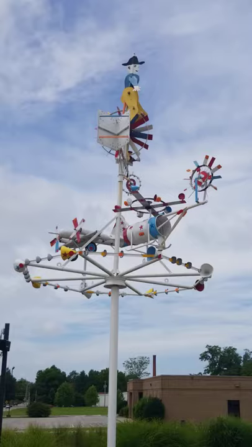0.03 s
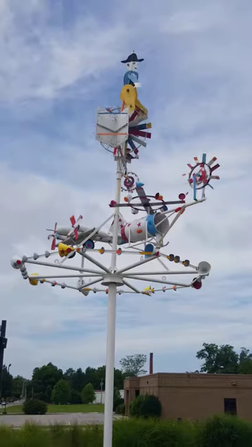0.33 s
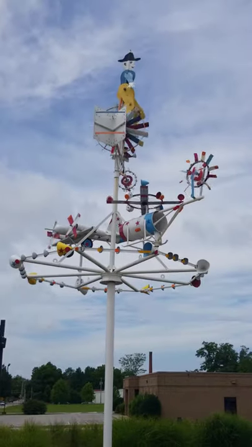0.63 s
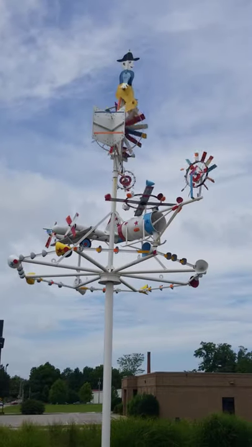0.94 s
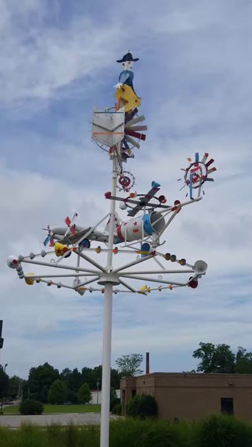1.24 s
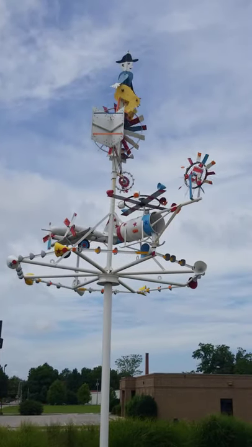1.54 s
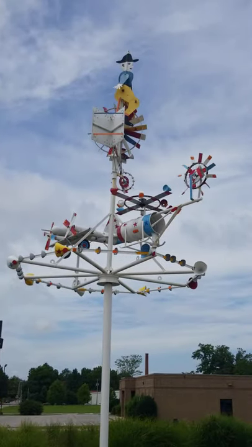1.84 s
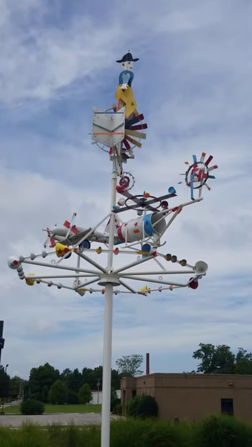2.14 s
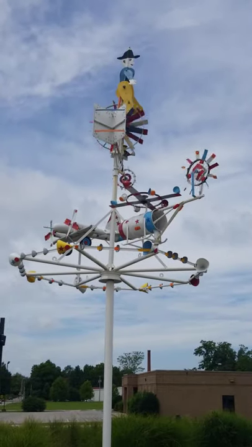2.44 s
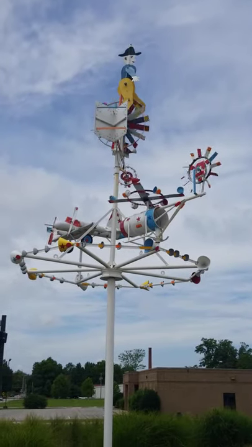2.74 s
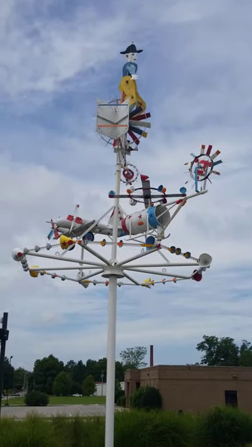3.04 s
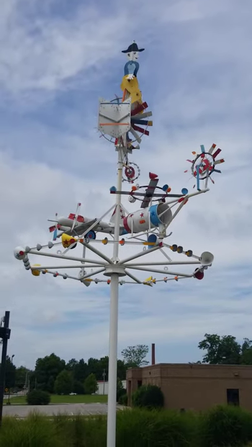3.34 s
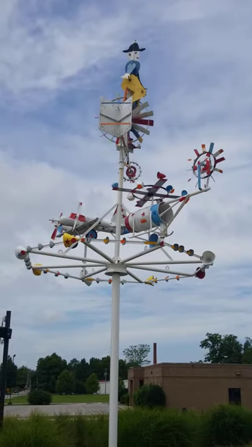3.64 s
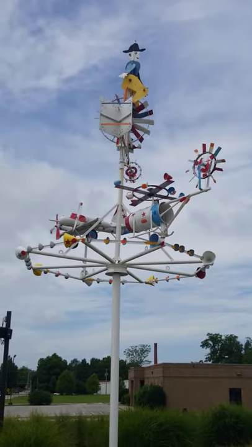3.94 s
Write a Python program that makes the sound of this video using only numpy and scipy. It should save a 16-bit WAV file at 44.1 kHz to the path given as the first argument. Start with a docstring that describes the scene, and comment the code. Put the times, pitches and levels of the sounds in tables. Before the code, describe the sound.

A metal whirligig ticks and creaks in the open air until a sharp steel clank brings a short scrape and three high squeaks. A fainter squeal comes later, with wind gusting on the microphone and far traffic throughout.

```python
"""Wind rumble on the microphone fades in over the steady wash of far traffic.
A tall metal whirligig turns in the light wind: its linkage ticks and its joints creak faintly.
The linkage drops with one sharp clank, ringing the steel, and scrapes on.
A dry bearing sticks and slips in three squeaks; later another sings faintly."""
import sys
import numpy as np
from scipy import signal
from scipy.fft import rfft, irfft
from scipy.io import wavfile

SR = 44100
rng = np.random.default_rng(int(sys.argv[2]) if len(sys.argv) > 2 else 0)


def wav_out(sig):
    """Save sig, one row per channel (or a flat mono array), as 16-bit PCM at SR to the path in sys.argv[1]."""
    wavfile.write(sys.argv[1], SR, np.round(np.clip(np.atleast_2d(sig).T, -1, 1) * 32767).astype(np.int16))


N = 176400
TIME_S = np.arange(N) / SR
FREQS_HZ = np.maximum(np.fft.rfftfreq(N, 1 / SR), 1)

# Gusts at the two microphone ports. Each row: centre and length in seconds, left and right relative dB.
GUSTS = [(0.556, 0.098, -34, -26.5), (0.67, 0.11, -26, -26.5), (0.942, 0.24, -39, -36.5),
         (1.181, 0.11, -38.5, -16), (1.33, 0.2, -34.5, -26), (1.496, 0.19, -28.5, -24),
         (1.655, 0.25, -36.5, -29.5), (1.775, 0.053, -47, -20.5), (1.874, 0.076, -44, -25.5),
         (2.069, 0.13, -33, -28.5), (2.192, 0.026, -31, -29), (2.383, 0.062, -42, -24),
         (2.444, 0.18, -28, -28), (2.613, 0.21, -36.5, -32.5), (3.21, 0.13, -28.5, -47),
         (3.35, 0.04, -27, -40), (3.465, 0.076, -32.5, -32), (3.772, 0.1, -30.5, -28.5),
         (3.96, 0.17, -28.5, -23)]
# Wind turbulence. Each row: frequency in Hz, relative density in dB.
RUMBLE_SPECTRUM = [(15, -30), (25, -16), (40, -5), (65, 5.5), (100, -3), (150, -11), (220, -17), (400, -25),
                   (1000, -57.5), (5000, -110)]
# Wash of far traffic and leaves. Each row: time in seconds, level in dB.
WASH_LEVELS = [(.5, -35.5), (.8, -32.5), (1.4, -34), (2.1, -34), (2.9, -35.5), (3.4, -34.5), (4, -36)]
# Wash colour. Each row: frequency in Hz, left and right relative density in dB.
WASH_SPECTRUM = [(25, -18, -22), (48.5, 6, 8.5), (68.6, 13, 12.5), (119, 8, 8.5), (203, 2.5, 3.5),
                 (332, -1.5, -0.5), (614, -3.5, -2), (990, -6, -3), (1700, -12, -2.5), (2920, -15, -10),
                 (3120, -17.5, -19.5), (3620, -19, -18), (4280, -20.5, -12), (5060, -20.5, -16),
                 (5980, -17, -27), (6290, -23, -30.5), (7800, -33, -22), (8630, -59, -30.5),
                 (10240, -38, -39.5), (11600, -35.5, -32.5), (13500, -42, -38), (16000, -38, -45)]
# Wash width. Each row: frequency in Hz, left-right correlation.
WASH_CORRELATION = [(60, 0.52), (200, 1), (400, 0.93), (700, 0.87), (1290, 0.44), (2400, 0), (15000, 0.05)]
# Far engines. Each row: centre and half-width in Hz, level in dB.
ENGINE_DRONES = [(72.9, 7.9, -42.5), (248.4, 14.3, -47.5), (533, 24, -53), (915, 130, -58)]
# Rattle of the turning wheels. Each row: frequency in Hz, relative density in dB.
RATTLE_SPECTRUM = [(1500, -15), (4000, 0), (8000, -6), (9500, -1), (12000, -1), (16000, -14)]
# Linkage ticks. Each row: start in seconds, level in dB, T60 in seconds, treble gain in dB.
LINKAGE_TICKS = [(0.457, -49, .02, 8), (.597, -33.5, 0.044, 4), (0.9904, -36.5, .012, 6),
                 (.995, -26.5, 0.013, -11), (1.252, -55, .04, -5), (2.1924, -44.5, 0.078, -4),
                 (2.6463, -48, 0.21, -10), (2.77, -48, 0.057, 5), (2.9323, -46, .04, -3),
                 (3.295, -43, 0.19, -12), (3.485, -46, .08, 0), (3.81, -46.5, 0.11, -3)]
# Tick colour. Each row: frequency in Hz, relative density in dB.
TICK_SPECTRUM = [(1000, -28), (2500, 3.5), (5500, 8.5), (8000, 0.5), (9500, -24), (13000, -3), (16000, -31)]
# Joint creaks. Each row: start and length in seconds, pitch, glide and RMS jitter in Hz, level in dB.
JOINT_CREAKS = [(0.547, 0.19, 4200, -84, 17, -55), (.65, .42, 7360, -450, 130, -64),
                (0.799, 0.26, 4820, -47, 150, -55), (1.169, 0.027, 2050, -21, 30, -44),
                (1.324, 0.012, 2270, 3, 130, -37.5), (1.364, 0.048, 2220, 60, 40, -44),
                (1.398, .06, 4950, 70, 43, -58), (1.407, 0.051, 2500, 98, 90, -47),
                (1.673, 0.09, 1950, 402, 110, -44), (1.726, 0.087, 2670, 354, 110, -48),
                (1.74, .06, 3560, -57, 40, -53), (2.457, .05, 2130, -90, 40.6, -54),
                (3.1, 0.036, 2420, 0, 50, -48)]
# Contacts of the dropping linkage. Each row: time in seconds, relative strength and treble gain in dB.
DROP_CONTACTS = [(1.5905, -22, 0), (1.6003, -9, -8), (1.6033, 1, 3), (1.6095, -5, -12), (1.6205, -6, -12),
                 (1.6845, -15, -28), (1.7135, -16, -14), (1.7178, -5, -26), (1.728, -14, -30)]
# Ringing steel. Each row: frequency in Hz, relative level in dB, T60 in seconds.
STEEL_MODES = [(2404, -10, .13), (3692, -7, .24), (3773, -4, .24), (3853, -3, .22), (3936, -7, .2),
               (4190, -6, .14), (4468, 2, .15), (4830, -4, .08), (5027, -3, .1), (5196, -5, .1),
               (5848, -8, .14), (6093, -10, .12), (8576, -22, .12), (11800, -22, .08)]
# Dense high modes of the struck frame. Each row: frequency in Hz, relative density in dB.
FRAME_SPECTRUM = [(1000, -36), (3300, -16), (3750, -2), (5000, 1), (6200, -7.5), (7200, -16), (8300, -11),
                  (9700, -26.5), (11900, -13), (13000, -28), (16000, -25)]
# Sliding metal. Each row: frequency in Hz, relative density in dB.
SCRAPE_SPECTRUM = [(1000, -23), (1900, -4), (2600, 4), (3200, -5.5), (4000, -3.5), (5000, 2.5),
                   (5800, -4.5), (7200, -6.5), (8800, -25), (12000, -24), (16000, -38)]
# Dry bearing. Each row: start and length in seconds, pitch and glide in Hz, level in dB.
BEARING_SQUEAKS = [(1.659, .048, 6665, -30, -45.5), (1.838, .06, 6640, -25, -45),
                   (1.975, .197, 6618, 20, -44.5)]
# Partials of the second bearing. Each row: frequency in Hz, amplitude in dB.
SINGING_PARTIALS = [(2476, -64), (4953, -65), (7429, -59)]
# Overall fade-in; the last gain holds. Each row: time in seconds, linear gain.
FADE_GAINS = [(.379, 0), (.381, 0.061), (.45, .3), (.52, 0.59), (.59, 0.83)]

TREBLE_HZ, BEARING_WOBBLE_HZ = 6900, 15


def from_db(db):
    """Decibels to gain."""
    return 10 ** (np.asarray(db) / 20)


def unit_rms(x):
    """Scale to unit power."""
    return x / np.sqrt(np.mean(x ** 2) + 1e-20)


def pan(left_minus_right_db):
    """Left and right gains at unit mean power."""
    return unit_rms(from_db(np.array([[left_minus_right_db], [-left_minus_right_db]]) / 2))


def over_time(rows):
    """Interpolate (seconds, value) rows."""
    return np.interp(TIME_S, *np.transpose(rows))


def over_hz(rows, column=1):
    """Interpolate one table column over log frequency."""
    rows = np.array(rows)
    return np.interp(np.log(FREQS_HZ), np.log(rows[:, 0]), rows[:, column])


def drift(corner_hz):
    """Low-passed random signal, unit RMS."""
    return unit_rms(irfft(rfft(rng.standard_normal(N)) / (1 + (FREQS_HZ / corner_hz) ** 2), N))


def noise(gain, correlation=0):
    """Stereo noise, unit RMS, with a given spectral gain and left-right correlation."""
    mid, side = rfft(rng.standard_normal((2, N)))
    ears = np.sqrt(1 + correlation) * mid + np.sqrt(1 - correlation) * side * [[1], [-1]]
    return unit_rms(irfft(gain * ears, N))


def lowpass(x, hz):
    """Steep zero-phase low-pass."""
    return irfft(rfft(x) / (1 + (FREQS_HZ / hz) ** 10), N)


def impulses(times_s, db):
    """One impulse per contact."""
    out = np.zeros(N)
    np.add.at(out, (np.asarray(times_s) * SR).astype(int), from_db(db))
    return out


def decay(hits, t60_s):
    """Amplitude envelope of hits whose energies add and die away."""
    energy_kept = from_db(-120 / (t60_s * SR))
    return np.sqrt(signal.lfilter([1], [1, -energy_kept], hits ** 2 + 1e-18))


def ring(hits, hz, t60_s):
    """One mode: a unit impulse starts a decaying sine of height 1."""
    radius, step_rad = from_db(-60 / (t60_s * SR)), 2 * np.pi * hz / SR
    feedback = [1, -2 * radius * np.cos(step_rad), radius ** 2]
    return signal.lfilter([0, np.sin(step_rad)], feedback, hits + 1e-18)


def arch(start_s, length_s):
    """Rounded rise and fall."""
    progress = np.clip((TIME_S - start_s) / length_s, 0, 1)
    return (4 * progress * (1 - progress)) ** 0.4


def swell(start_s, attack_s, t60_s):
    """Linear rise, exponential decay."""
    age_s = TIME_S - start_s
    return np.clip(age_s / attack_s, 0, 1) * from_db(-60 * np.maximum(age_s - attack_s, 0) / t60_s)


def glide_phase(start_s, length_s, hz, glide_hz, wobble_hz):
    """Phase in radians of an unsteady sliding tone."""
    progress = np.clip((TIME_S - start_s) / length_s, 0, 1)
    return 2 * np.pi * np.cumsum(hz + glide_hz * progress + wobble_hz) / SR


def wind():
    """Low turbulence, different at each port; stronger gusts are brighter."""
    breeze_db, buffet_db, full_gust_db = -42, 2, -20.5
    power = from_db(breeze_db) ** 2
    for centre_s, length_s, left_db, right_db in GUSTS:
        bell = np.exp(-(2 * (TIME_S - centre_s) / length_s) ** 2)
        power = power + from_db([[left_db], [right_db]]) ** 2 * bell
    force = np.sqrt(power) * from_db(buffet_db * drift(9.3))
    eddies = noise(from_db(over_hz(RUMBLE_SPECTRUM)), correlation=0.39)
    low = lowpass(eddies, hz=153)
    brightness = (force / from_db(full_gust_db)) ** 0.4
    return from_db(-1.6) * force * (low + brightness * (eddies - low))


def traffic():
    """Far roads: a smooth wash plus narrow noise bands of engine drone."""
    colour = from_db([over_hz(WASH_SPECTRUM, column=1), over_hz(WASH_SPECTRUM, column=2)])
    wash_db = over_time(WASH_LEVELS) + 0.34 * drift(18)
    wash = from_db(wash_db) * noise(colour, over_hz(WASH_CORRELATION))
    drones = 0
    for hz, half_width_hz, db in ENGINE_DRONES:
        band = 1 / (1 + ((FREQS_HZ - hz) / half_width_hz) ** 2)
        drones = drones + from_db(db) * noise(band, correlation=1)
    return wash + drones * pan(-0.068)


def ticks():
    """Light linkage contacts over the faint random rattle of the wheels."""
    taps_per_s, tap_db, scatter_db = 30, -64, 3
    taps = (rng.random(N) < taps_per_s / SR) * from_db(tap_db + scatter_db * rng.standard_normal(N))
    out = decay(taps, t60_s=0.05) * noise(from_db(over_hz(RATTLE_SPECTRUM)))
    body = noise(from_db(over_hz(TICK_SPECTRUM)))
    low = lowpass(body, TREBLE_HZ)
    for start_s, db, t60_s, treble_db in LINKAGE_TICKS:
        envelope = decay(impulses([start_s], [db]), t60_s)
        out = out + envelope * (low + from_db(treble_db) * (body - low))
    return out * pan(-3)


def creaks():
    """Joints rub: short tones whose pitch jitters separately in each ear."""
    out = np.zeros((2, N))
    for ear, jitter in enumerate([drift(200), drift(193.4)]):
        for start_s, length_s, hz, glide_hz, jitter_hz, db in JOINT_CREAKS:
            phase = glide_phase(start_s, length_s, hz, glide_hz, jitter_hz * jitter)
            out[ear] += from_db(db) * arch(start_s, length_s) * np.sin(phase)
    return np.sqrt(2) * out * pan(-8.5)


def clank():
    """The linkage drops: each contact rings the steel, cracks and shakes the frame; bounces are duller."""
    ring_db, crack_db, frame_db, scatter_db = -37, -22, -33.5, 1.5
    times_s, hit_db, treble_db = np.transpose(DROP_CONTACTS)
    out = 0
    for hz, mode_db, t60_s in STEEL_MODES:
        drive_db = ring_db + hit_db + mode_db + treble_db * (hz > TREBLE_HZ)
        ears_db = drive_db + scatter_db * rng.standard_normal((2, len(times_s)))
        out = out + np.array([ring(impulses(times_s, db), hz, t60_s) for db in ears_db])
    dense_modes = noise(from_db(over_hz(FRAME_SPECTRUM)), correlation=0.18)
    low = lowpass(dense_modes, TREBLE_HZ)
    for band, db in ((low, hit_db), (dense_modes - low, hit_db + treble_db)):
        hits = impulses(times_s, db)
        crack = from_db(crack_db) * decay(hits, t60_s=0.018)
        shake = from_db(frame_db) * decay(hits, t60_s=0.2)
        out = out + band * (crack + shake)
    return out * pan(-3.5)


def scrape():
    """Metal slides on after the drop: rough noise that swells and dies."""
    level_db = -38 + drift(90)
    envelope = swell(start_s=1.653, attack_s=0.09, t60_s=1)
    return from_db(level_db) * envelope * noise(from_db(over_hz(SCRAPE_SPECTRUM)))


def squeaks():
    """Stick-slip in a dry bearing: a trembling tone, a weak beating partner and the octave."""
    beat_hz, partner_db, octave_db, rough_db = 85, -23, -22, 2.3
    wobble_hz = BEARING_WOBBLE_HZ * drift(51)
    tremble = from_db(rough_db * drift(55))
    out = 0
    for start_s, length_s, hz, glide_hz, db in BEARING_SQUEAKS:
        phase = glide_phase(start_s, length_s, hz, glide_hz, wobble_hz)
        partner = from_db(partner_db) * np.sin(phase + 2 * np.pi * beat_hz * TIME_S)
        octave = from_db(octave_db) * np.sin(2 * phase)
        tone = (np.sin(phase) + partner) * pan(10) + octave * pan(-9)
        out = out + from_db(db) * arch(start_s, length_s) * tone
    return np.sqrt(2) * tremble * out


def singing():
    """A second bearing squeals faintly and fades; each partial flickers separately."""
    rough_db = 2
    wobble_hz = BEARING_WOBBLE_HZ * drift(69.3)
    tone = 0
    for hz, db in SINGING_PARTIALS:
        phase = 2 * np.pi * np.cumsum(hz + wobble_hz) / SR
        tone = tone + from_db(db + rough_db * drift(25)) * np.sin(phase)
    return tone * swell(start_s=3.12, attack_s=0.1, t60_s=1.8) * pan(-14)


def scene():
    """The whirligig in wind and traffic, stereo."""
    return wind() + traffic() + clank() + scrape() + ticks() + squeaks() + creaks() + singing()


def record(dry):
    """Short silence, fade-in, steep treble cut."""
    cutoff_hz = 15800
    treble_cut = signal.ellip(12, 0.1, 80, cutoff_hz, fs=SR, output="sos")
    return signal.sosfilt(treble_cut, dry * over_time(FADE_GAINS))


dry = scene()
out = record(dry)
wav_out(out)
```